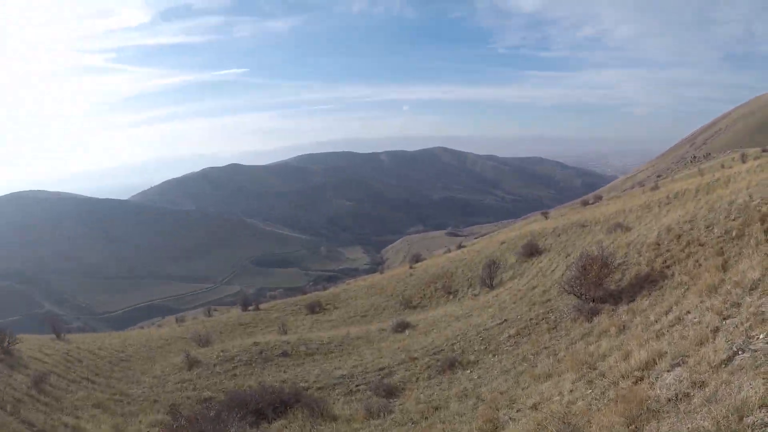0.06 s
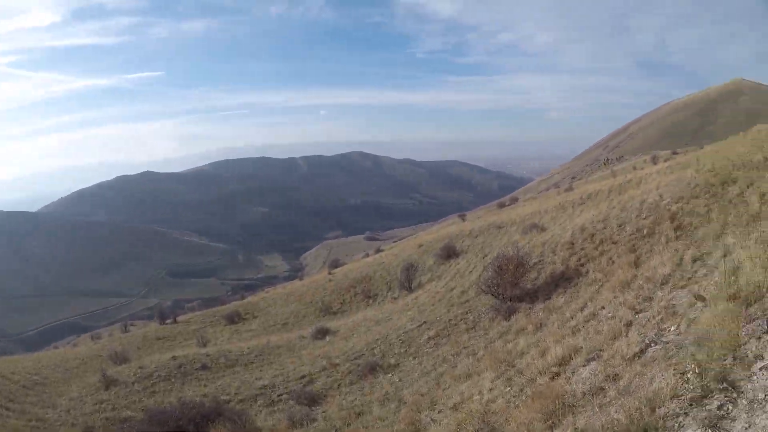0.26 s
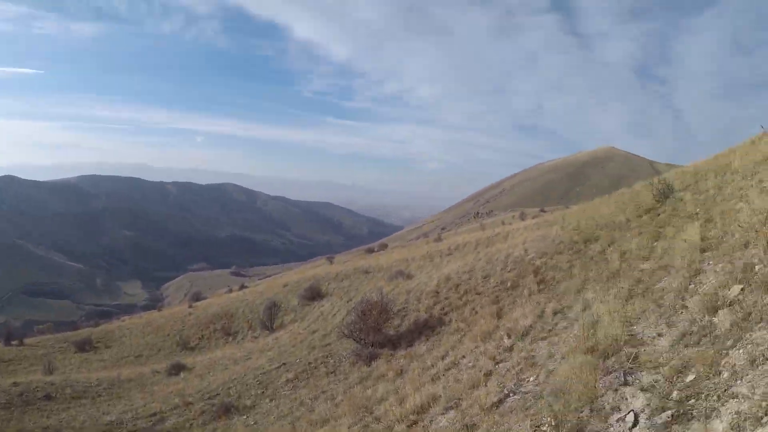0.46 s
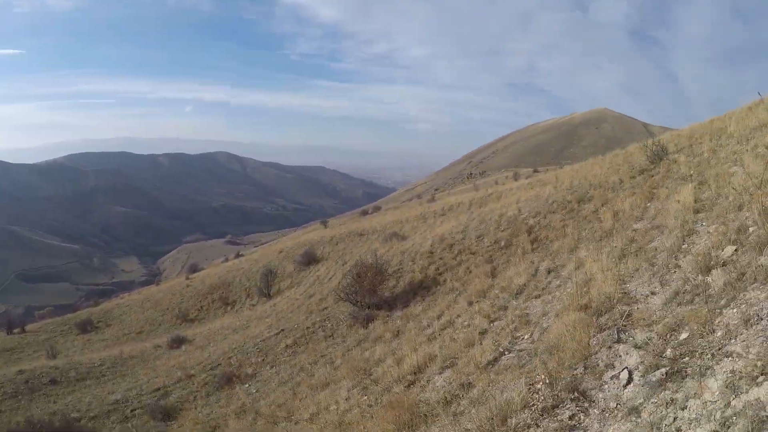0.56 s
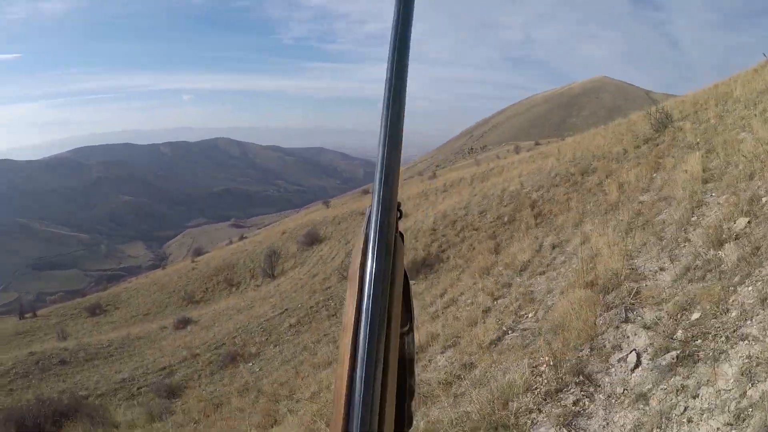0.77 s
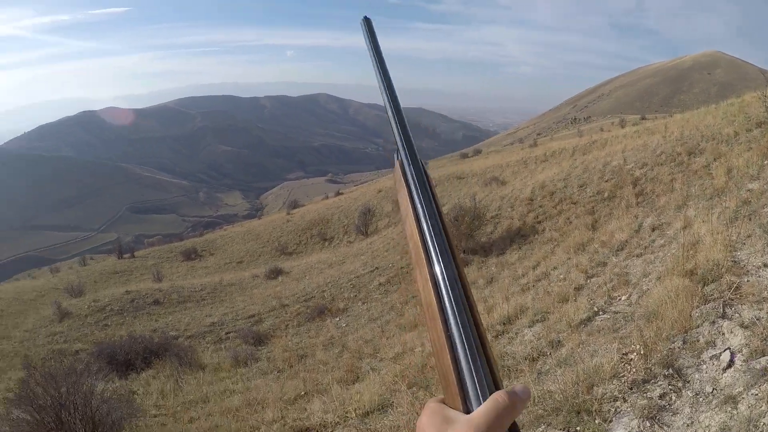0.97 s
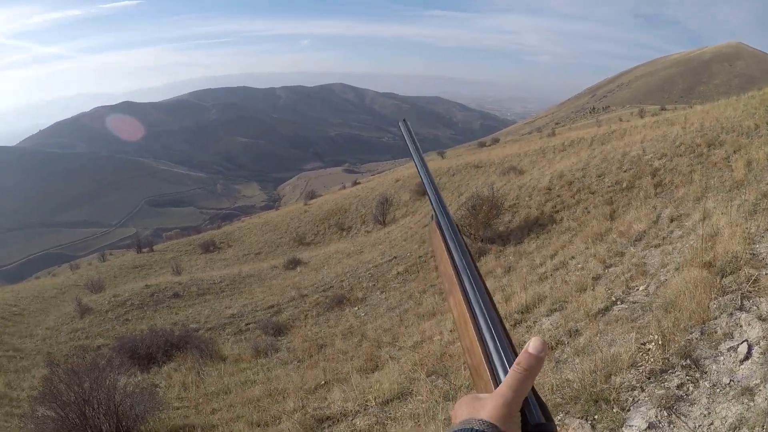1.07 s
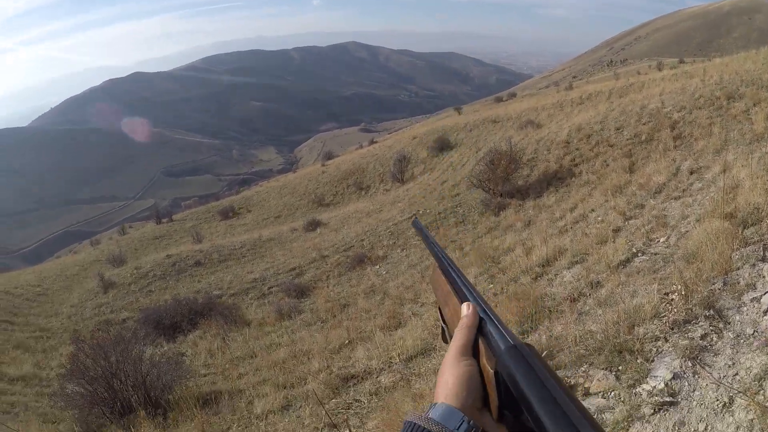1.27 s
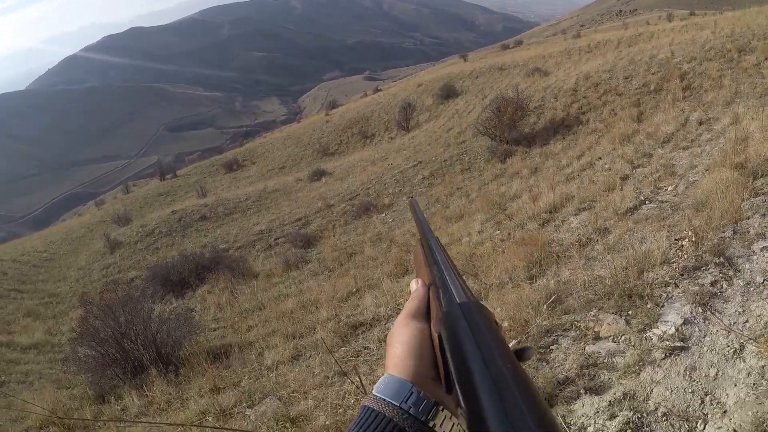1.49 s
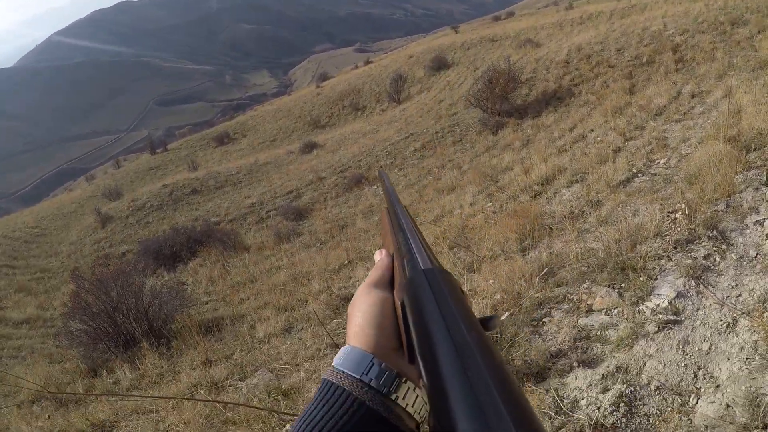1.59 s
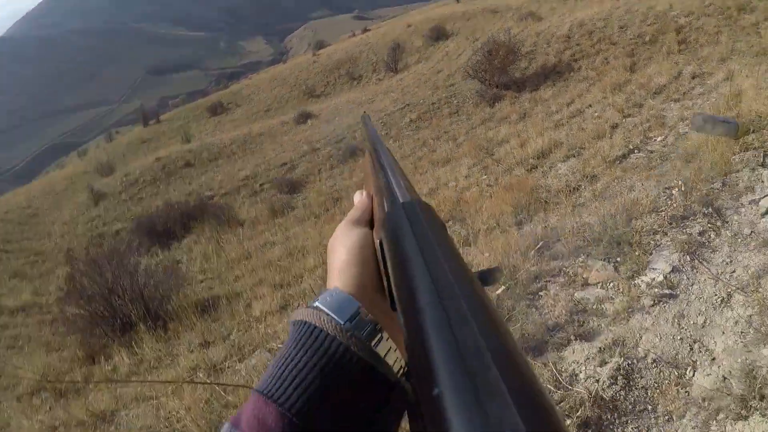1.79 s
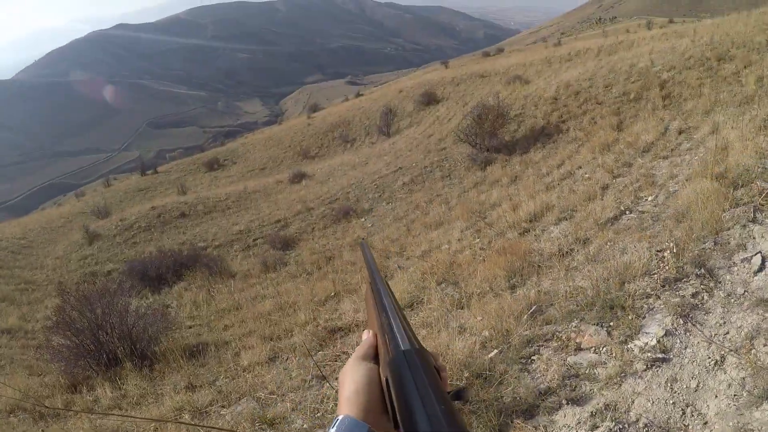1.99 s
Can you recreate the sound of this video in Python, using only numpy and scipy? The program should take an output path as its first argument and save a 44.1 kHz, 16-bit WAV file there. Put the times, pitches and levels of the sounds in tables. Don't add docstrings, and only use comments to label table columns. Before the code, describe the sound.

A single shotgun shot at about 1.7 seconds: a dry, stuttering crack with a brief roar, low thump and woody recoil knock, barely any tail. Before it, gusty wind rumbles and buffets a body-worn microphone on an open hillside, with gear taps and cloth rubs, faint cricket pips from 0.35 to 1.3, and bird whistles near 1.05, 1.25 and 1.4. The action clacks at 1.82; faint taps end it.

```python
import sys
import numpy as np
from scipy import signal
from scipy.io import wavfile
from scipy.ndimage import uniform_filter1d

SR = 44100
rng = np.random.default_rng(int(sys.argv[2]) if len(sys.argv) > 2 else 0)


def attenuation_scalar(level_db):
    decades = np.asarray(level_db, float) / 20
    return 10 ** decades


def master(y):
    cut = np.clip(np.atleast_2d(y).T, -1, 1)
    pcm = np.round(cut * 32767)
    wavfile.write(sys.argv[1], SR, pcm.astype(np.int16))


N = 90404
CAMERA_PAN_DB = -2.5


def evened(x):
    return x / np.sqrt(np.mean(x ** 2) + 1e-20)


def steadied(x, size):
    power = uniform_filter1d(x.mean(0) ** 2, size=size)
    return evened(x / power.clip(1e-4) ** 0.48)


def read(points, hz):
    point_hz, value = np.transpose(points)
    return np.interp(np.log(hz + 1), np.log(point_hz + 1), value)


def curve(table, column):
    rows = np.array(table)
    return np.interp(np.arange(N) / SR, rows[:, 0], rows[:, column])


def add(mix, start_s, sound):
    part = mix[:, round(start_s * SR):][:, :sound.shape[1]]
    part += sound[:, :part.shape[1]]


def panned(x, db):
    return x * attenuation_scalar(np.array([db / 2, -db / 2]).reshape(2, -1))


def resonate(x, hz, width):
    pole = np.exp((2j * np.pi * hz - np.pi * width) / SR)
    return 2 * signal.lfilter([1 - abs(pole)], [1, -pole], x).real


def noise(colour, likeness, size, patchy_db, flicker_db):
    hz = np.fft.rfftfreq(size, 1 / SR)
    a, b, c, d, patches = rng.standard_normal((4 * N // size + 5, len(hz), 5)).T
    patches = uniform_filter1d(patches, size=8, axis=0)
    patches = evened(uniform_filter1d(patches, size=5, axis=1))
    flicker = evened(uniform_filter1d(rng.standard_normal(a.shape[1]), size=3))
    like = np.clip(read(likeness, hz), -1, 1)[:, None]
    left = a + 1j * b
    right = like * left + np.sqrt(1 - like ** 2) * (c + 1j * d)
    level_db = read(colour, hz)[:, None] + patchy_db * patches + flicker_db * flicker
    bins = np.array([left, right]) * attenuation_scalar(level_db)
    return evened(signal.istft(bins, nperseg=size, noverlap=3 * size // 4)[1][:, :N])


# start_s [s], force_db [dB], pan_db [dB], roar_db [dB over force]
WIND_GUSTS = [(0, -30.5, 6, -17.5), (.1, -37, -5, -8.5), (.19, -32.5, 7.5, -19), (.34, -23.5, -13, -17),
              (.44, -25.5, -10, -2), (.52, -24, -8.5, -9), (.58, -27.5, -9.5, -11.5),
              (.65, -28.5, -6.5, -11), (.72, -24, -4.5, -13.5), (.79, -24, -9.5, -16),
              (.84, -27.5, -1.5, -12.5), (.91, -21.5, -6, -21), (.97, -28.5, 10.5, -15),
              (1.02, -28, 1, -16.5), (1.29, -20, 1, -19), (1.39, -21.5, -4, -19.5), (1.7, -29, -6.5, -18.5),
              (2.05, -54.5, -8.5, 8.5)]
# pitch_hz [Hz], level_db [dB per Hz]
RUMBLE_COLOUR = [(8.8, -82), (15, 11.5), (39, -2), (80, -14.5), (210, -31), (333, -43), (486, -41),
                 (900, -50.5), (1170, -50), (1980, -120)]
# pitch_hz [Hz], level_db [dB per Hz]
ROAR_COLOUR = [(60, -10), (150, 0), (350, -5.5), (800, -24.5), (2000, -27.5), (5000, -54)]
# pitch_hz [Hz], level_db [dB per Hz]
GRASS_COLOUR = [(180, -57), (300, -4.5), (2700, -24.5), (4510, -27), (4890, -31), (6170, -22.5),
                (10800, -34.5), (12800, -38), (15600, -75)]
# pitch_hz [Hz], likeness [-1 to 1]
PORT_LIKENESS = [(60, -0.57), (180, -0.15), (550, -0.97), (1650, -0.27), (4970, 0.069), (15000, 1)]


def wind():
    force_db = curve(WIND_GUSTS, column=1)
    rumble_colour = [(5, -60)] + list(RUMBLE_COLOUR) + [(2000, -102)]
    rumble = noise(rumble_colour, PORT_LIKENESS, size=4096, patchy_db=1.5, flicker_db=5.5)
    rumble = steadied(rumble, size=2500) * attenuation_scalar(force_db + 7.5)
    roar = noise(ROAR_COLOUR, PORT_LIKENESS, size=512, patchy_db=4.5, flicker_db=2.5)
    roar = steadied(roar, size=1500) * attenuation_scalar(force_db + curve(WIND_GUSTS, column=3))
    grass_colour = [(100, -41)] + list(GRASS_COLOUR)
    hiss = noise(grass_colour, PORT_LIKENESS, size=256, patchy_db=1.2, flicker_db=0.5)
    hiss = hiss * attenuation_scalar(-49 + 0.15 * (force_db + 23))
    return panned(rumble, curve(WIND_GUSTS, column=2)) + panned(roar + hiss, CAMERA_PAN_DB)


# start_s [s], level_db [dB], pitch_hz [Hz], length_s [s], pan_db [dB]
PORT_PUFFS = [(0.03, -31.5, 70, 0.07, 6), (0.161, -34.5, 91, 0.037, 11.5), (0.208, -33, 139, 0.025, 4),
              (0.248, -25, 88, 0.046, 13.5), (.415, -32, 221.6, 0.038, -18),
              (0.503, -31, 202.5, 0.023, -15), (0.608, -28, 110, 0.03, 15), (0.638, -22, 104, 0.023, 7.5),
              (.765, -20.5, 60.4, 0.038, -3), (0.818, -26.5, 108.7, 0.035, 6),
              (0.842, -23, 99.4, 0.034, -1.5), (0.953, -22.5, 73.4, 0.033, 12.5),
              (1.003, -34, 99, 0.026, 5), (1.05, -30.5, 96, 0.036, 15), (1.097, -39, 102, 0.034, 3),
              (1.173, -36, 77, 0.047, -8), (1.225, -22.5, 80, 0.03, 6), (1.275, -24, 81, 0.027, 18),
              (1.36, -23, 93, 0.026, -4), (1.39, -21.5, 115, 0.026, 1), (1.51, -33, 130, .04, -0.5),
              (1.775, -23.5, 58, 0.029, 5), (1.872, -62, 300, 0.028, 0), (1.889, -52, 433, 0.021, -6)]


def puffs():
    out = np.zeros((2, N))
    for start_s, level_db, pitch_hz, length_s, pan_db in PORT_PUFFS:
        a, b, c = rng.random(3)
        u = np.arange(0, 1, 1 / (length_s * SR))
        uneven = u + 0.062 * np.sin(2 * np.pi * (u + c))
        port_lag = np.array([[a], [a + 0.51 * b]])
        turn = 2 * np.pi * (pitch_hz * length_s * uneven + port_lag)
        swing = np.sin(turn) + 0.18 * np.sin(2 * turn + 1)
        add(out, start_s, panned(np.sin(np.pi * u) ** 2 * swing * attenuation_scalar(level_db + 3.5), pan_db))
    return out


# length_s [s], level_db [dB], pitch_hz [Hz], width_hz [Hz]
BRUSH_STROKES = [
    (0.59, -54, 4400, 8400),
    (0.029, -38, 750, 730),
    (0.051, -40.5, 730, 1200),
    (0.063, -45, 1100, 830),
    (0.089, -45.5, 4700, 7300),
    (0.091, -47, 2600, 6100),
    (0.13, -45, 393, 440),
]
STROKE_STARTS = [.2, .384, .428, .49, 1.225, 1.82, 1.84]


def brushes():
    out = np.zeros((2, N))
    for start_s, (length_s, level_db, pitch_hz, width_hz) in zip(STROKE_STARTS, BRUSH_STROKES):
        u = np.arange(SR) / (length_s * SR)
        lumps, both, left, right = rng.standard_normal((4, SR))
        grain = attenuation_scalar(4.5 * evened(uniform_filter1d(lumps, size=120)))
        rub = (both + .7 * np.array([left, right])) * grain
        rub = evened(resonate(resonate(rub, pitch_hz, width_hz), pitch_hz, width_hz))
        swell = np.sin(np.pi * u.clip(0, 1) ** 0.66)
        add(out, start_s, panned(rub * swell * attenuation_scalar(level_db), CAMERA_PAN_DB))
    return out


# pitch_hz [Hz], width_hz [Hz], level_db [dB]
HOUSING_DULL = [(706, 400, 11), (1075, 1050, 4.5), (1910, 1070, 1.5)]
# pitch_hz [Hz], width_hz [Hz], level_db [dB]
HOUSING_MIDDLE = [(3370, 1480, -16), (4350, 910, -11)]
# pitch_hz [Hz], width_hz [Hz], level_db [dB]
HOUSING_BRIGHT = [(6600, 1180, 15.5), (8200, 1800, 4), (10880, 5300, -1.5)]


def housing_knocks(table, t60_s, wide):
    out, t = np.zeros((2, N)), np.arange(4096) / SR
    wake = attenuation_scalar(-28 - 60 * t / .05)
    shape = np.minimum(t / 0.00041, 1) * (attenuation_scalar(-60 * t / t60_s) + wake)
    snap = 2 * np.exp(-((t - .0004) / .00003) ** 2)
    for start_s, level_db, bright_db, dull_db, *pan_db in table:
        burst = rng.standard_normal(len(t)) + .7 * rng.standard_normal((2, len(t)))
        strike = burst * shape + snap
        sound = 0
        for group, group_db in ((HOUSING_DULL, dull_db), (HOUSING_MIDDLE, 0), (HOUSING_BRIGHT, bright_db)):
            part = 0
            for k, (hz, width, gain_db) in enumerate(group):
                ring = resonate(resonate(strike, hz, width * wide), hz, width * wide)
                part = part + (-1) ** k * attenuation_scalar(gain_db) * ring
            sound = sound + attenuation_scalar(group_db) * part / abs(part).max()
        pan = pan_db[0] if pan_db else CAMERA_PAN_DB
        add(out, start_s, panned(sound * attenuation_scalar(level_db), pan))
    return signal.sosfilt(signal.butter(2, 430, "high", fs=SR, output="sos"), out)


# start_s [s], level_db [peak dB], bright_db [dB], dull_db [dB]
GEAR_RATTLES = [(.2572, -33, -0.5, -8), (.2900, -50, -9, 14), (.3071, -29.5, -5.5, -32),
                (.333, -53, -6, 11), (.380, -46, 9, -8), (.3914, -36, -4, 4.5), (.4105, -43, -1, 8),
                (.4325, -47.5, 8.5, 14), (.4468, -41.5, -14, 16), (.4872, -42, -20, 2), (.501, -49, -6, 3),
                (.5425, -38, -4, -13), (.588, -43.5, 8, 9), (.630, -48, -2, 9), (.6648, -41, -20, -2),
                (.705, -50, -6, 6), (.739, -43, 2.5, 6), (.820, -47, 1, -12), (.853, -50, 0, -6),
                (.887, -58, -10, 17), (.897, -53, -15, 12), (.942, -51.5, -10, 12.5),
                (.985, -49.5, -8, 6.5), (1.105, -48, 3, 9), (1.120, -50.5, -10, 10), (1.229, -44, 3, 10.5),
                (1.305, -47.5, 9, -11), (1.3846, -40.5, -18, 4), (1.5572, -57.5, -10, 22.5),
                (1.950, -47.5, -2, -17), (2.0140, -41.5, -1.5, 5.5), (2.0170, -45.5, -6, 11.5),
                (2.044, -45, 0, -8)]


def rattles():
    return housing_knocks(GEAR_RATTLES, t60_s=.012, wide=1.6)


CRICKET_PIPS = [-57, -37, -41, -38, -36, -31.5, -34.5, -39.5, -41, -42, -48, -44, -43, -46, -40, -43.5, -44,
                -50, -55]


def cricket():
    out = np.zeros((2, N))
    start_s, gap_s, slowing_s = .3378, .0541, .00008
    for k, level_db in enumerate(CRICKET_PIPS):
        a, b, c = rng.uniform(-1.4, 1, 3)
        length_s = 0.0099 * (1 + 0.28 * a)
        u = np.arange(0, 1, 1 / (length_s * SR))
        pitch_hz = 4670 * (1 + 0.023 * b - 0.16 * (1 + .5 * c) * u)
        pip = np.sin(np.pi * u ** .8) ** 2 * np.sin(2 * np.pi * np.cumsum(pitch_hz) / SR)
        add(out, start_s + k * gap_s + k * k * slowing_s, panned(pip * attenuation_scalar(level_db - 6), -2.7))
    return out


# start_s [s], level_db [dB], top_hz [Hz], push_db [dB at the top], scatter_db [dB]
BIRD_CALLS = [
    (1.042, -42, 3900, -10, -3.5),
    (1.233, -44.5, 4090, 4, -1.5),
    (1.4226, -41, 3660, 12, 3),
]


def bird():
    length_s, top_at, scatter_t60_s = .029, 0.429, 0.16
    out, t, u = np.zeros((2, N)), np.arange(0, .2, 1 / SR), np.arange(0, 1, 1 / (length_s * SR))
    arch = np.interp(u, [0, top_at, 1], [.5, 1, 0.33])
    arch = uniform_filter1d(arch, size=130, mode="nearest")
    for start_s, level_db, top_hz, push_db, scatter_db in BIRD_CALLS:
        shake, wobble = (evened(uniform_filter1d(v, size=70))[:len(u)]
                         for v in rng.standard_normal((2, 4096)))
        turn = 2 * np.pi * np.cumsum(top_hz * arch * (1 + 0.023 * shake)) / SR
        whistle = np.sin(turn) + 0.025 * np.sin(2 * turn)
        call = np.sin(np.pi * u) ** 0.34 * attenuation_scalar(2.5 * wobble.clip(-2, 1)) * whistle
        push = attenuation_scalar(push_db * np.exp(-((u - top_at - .05) / 0.073) ** 2))
        slope = rng.standard_normal(len(t)) + 0.15 * rng.standard_normal((2, len(t)))
        slope = slope * np.clip((t - .004) / 0.0013, 0, 1) * attenuation_scalar(-60 * t / scatter_t60_s)
        slope = slope / np.linalg.norm(slope[0])
        scatter = signal.fftconvolve(call[None], slope, axes=1)
        add(out, start_s, panned(call * push * attenuation_scalar(level_db), -0.88))
        add(out, start_s + .014, panned(call * attenuation_scalar(level_db - 12), -6))
        add(out, start_s, scatter * attenuation_scalar(level_db + scatter_db))
    return out


# start_s [s], roar_db [dB], thump_db [dB]
MUZZLE_SWELL = [
    (1.684, -59, -60),
    (1.700, -33.5, -46),
    (1.712, -22.5, -28),
    (1.727, -17.5, -21),
    (1.737, -27, -12),
    (1.747, -37, -29.5),
    (1.765, -41, -35),
    (1.79, -54, -39),
    (1.82, -35.5, -63),
]
# pitch_hz [Hz], level_db [dB per Hz]
MUZZLE_COLOUR = [(170, 2.5), (380, -13.5), (700, -3.5), (1700, -13.5), (4300, -11.5), (7000, -13.5),
                 (11000, -31)]


def blast():
    t = np.arange(N) / SR
    fade_in = np.clip((t - MUZZLE_SWELL[0][0]) / 0.005, 0, 1)
    fade_out = np.clip((MUZZLE_SWELL[-1][0] - t) / 0.016, 0, 1)
    likeness = [(200, 0.87), (9000, 0.11)]
    roar = noise(MUZZLE_COLOUR, likeness, size=256, patchy_db=-1.0, flicker_db=4.5)
    roar = panned(roar * attenuation_scalar(curve(MUZZLE_SWELL, column=1) + 3), -0.68)
    late = t - 1.7355
    sagging_hz = 128 - 310 * late.clip(-.05, .05)
    port_phase = np.array([[0], [.3]])
    thump = np.cos(2 * np.pi * late * sagging_hz + port_phase) * attenuation_scalar(curve(MUZZLE_SWELL, column=2))
    return fade_in * fade_out * (roar + thump)


# start_s [s], level_db [dB], bright_db [dB], dull_db [dB], pan_db [dB]
SHOT_CRACKS = [
    (1.6867, -19, -7.5, -2, 0.5),
    (1.6925, -39, -3, 13, -3),
    (1.6978, -32, -4, 1, -10),
    (1.7081, -13, -20, 1, -1),
    (1.7143, -19, -11, -13, -2),
    (1.7187, -6.5, -17, -6.5, 7.5),
    (1.7225, -25, 8, -21, 2),
    (1.7250, -12.5, 6.5, -6.5, -17.5),
    (1.7295, -3.5, 1.5, -0.5, 1),
    (1.7430, -32, -1, -11, 0),
]


def cracks():
    return housing_knocks(SHOT_CRACKS, t60_s=.005, wide=1.1)


# start_s [s], pitch_hz [Hz], level_db [dB], rise_s [s], t60_s [s]
STEEL_RINGS = [
    (1.696, 7900, -36, .026, .03),
    (1.826, 5500, -58, .02, .3),
]


def steel():
    out, t = np.zeros((2, N)), np.arange(SR // 3) / SR
    for start_s, pitch_hz, level_db, rise_s, t60_s in STEEL_RINGS:
        shape = np.minimum(t / rise_s, 1) * attenuation_scalar(level_db - 60 * np.maximum(t - rise_s, 0) / t60_s)
        flutter = 1 + 0.98 * evened(uniform_filter1d(rng.standard_normal(len(t)), size=150))
        add(out, start_s, panned(shape * flutter * np.sin(2 * np.pi * pitch_hz * t), -16.5))
    return out


HOLLOW_KNOCKS = [
    -35,
    -17,
    -8.5,
    -15.5,
]
# pitch_hz [Hz], width_hz [Hz], level_db [dB]
HOLLOW_RESONANCES = [(586, 330, 4.5), (937, 234, 1.5)]


def hollow_stutter():
    out, t = np.zeros((2, N)), np.arange(2048) / SR
    start_s, gap_s = 1.6981, .0107
    ring = 0
    for pitch_hz, width_hz, level_db in HOLLOW_RESONANCES:
        swell = t * width_hz * np.exp(1 - np.pi * width_hz * t)
        ring = ring + attenuation_scalar(level_db) * swell * np.sin(2 * np.pi * pitch_hz * t)
    ring = ring / abs(ring).max()
    for k, level_db in enumerate(HOLLOW_KNOCKS):
        add(out, start_s + k * gap_s, panned(ring * attenuation_scalar(level_db), -1.8))
    return out


# start_s [s], level_db [dB], bright_db [dB], dull_db [dB], pan_db [dB]
ACTION_SLAMS = [
    (1.8222, -26.5, 4.5, -21, -2),
    (1.8250, -35, -16, 3, -11),
]


def action():
    return housing_knocks(ACTION_SLAMS, t60_s=0.041, wide=3.84)


def scene():
    hillside = wind() + puffs() + brushes() + rattles() + cricket() + bird()
    shot = blast() + cracks() + steel() + hollow_stutter() + action()
    return hillside + shot


def top_cut(x):
    return signal.sosfilt(signal.butter(12, 15710, fs=SR, output="sos"), x)


def record(dry):
    soft = signal.sosfilt(signal.butter(3, 12000, fs=SR, output="sos"), dry)
    return top_cut(np.clip(soft, -1, 1))


dry = scene()
out = record(dry)
master(out)
```